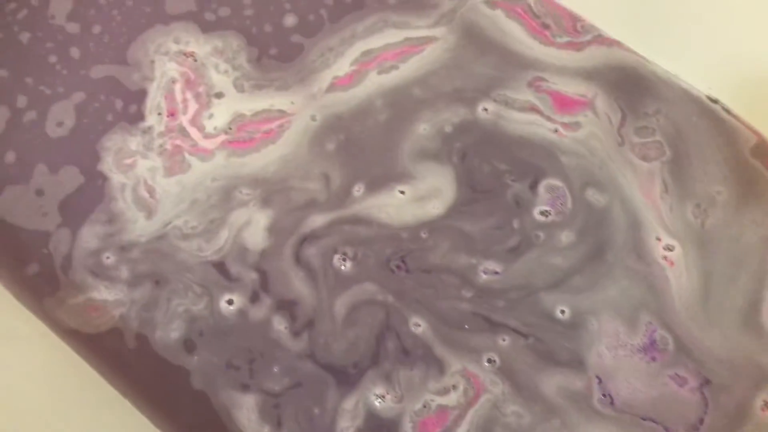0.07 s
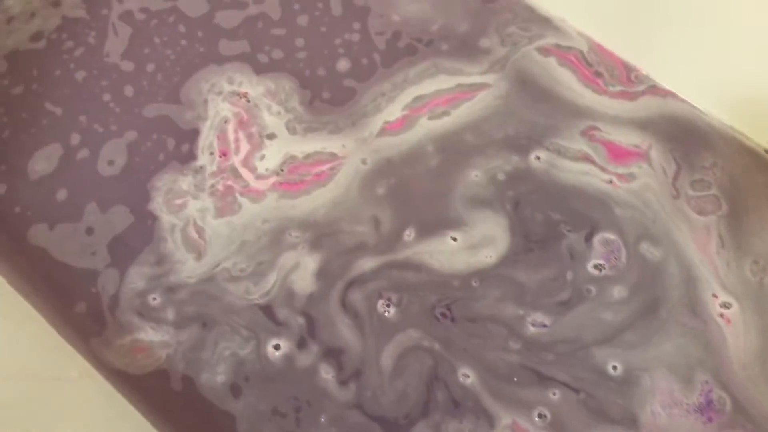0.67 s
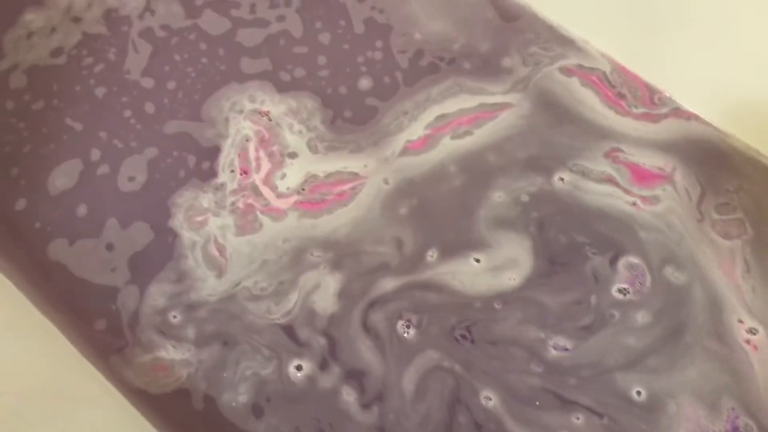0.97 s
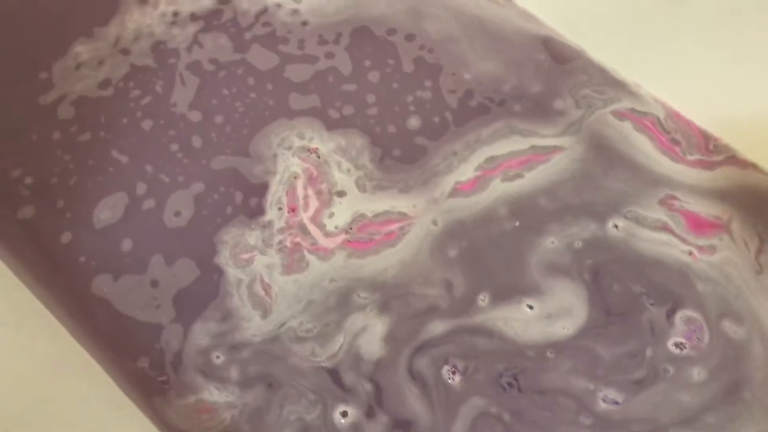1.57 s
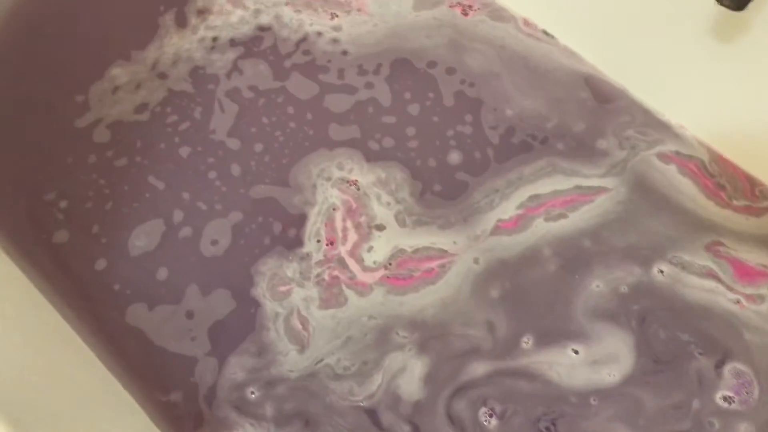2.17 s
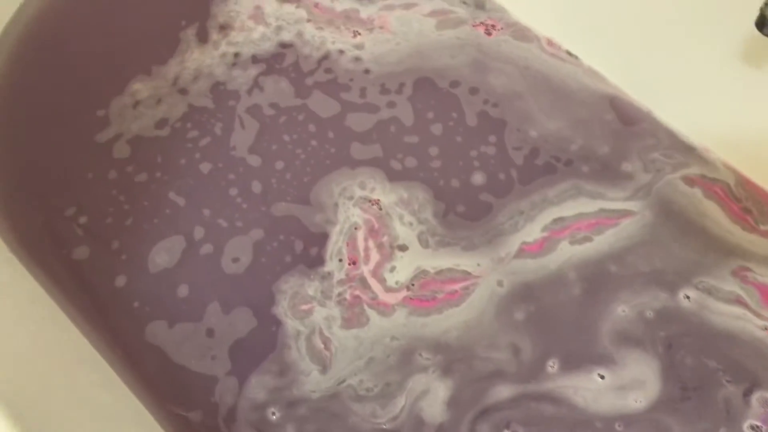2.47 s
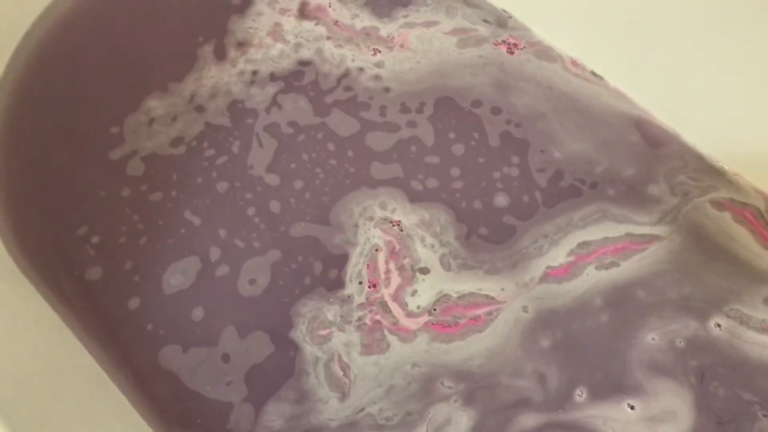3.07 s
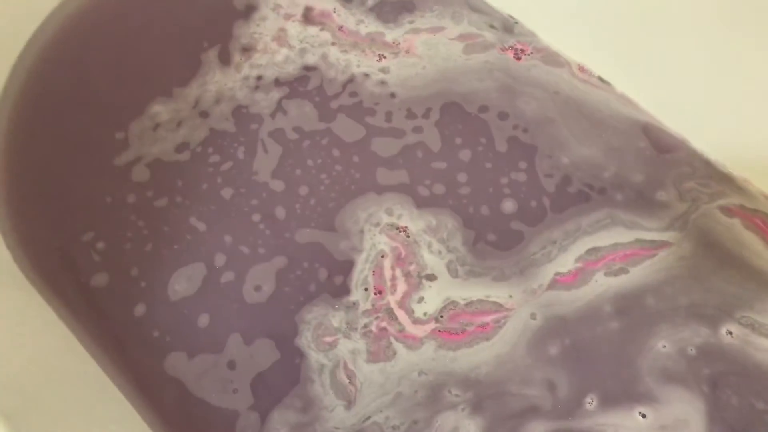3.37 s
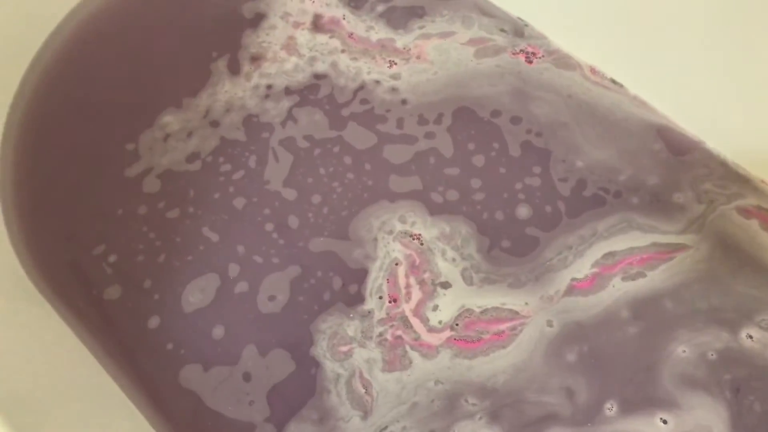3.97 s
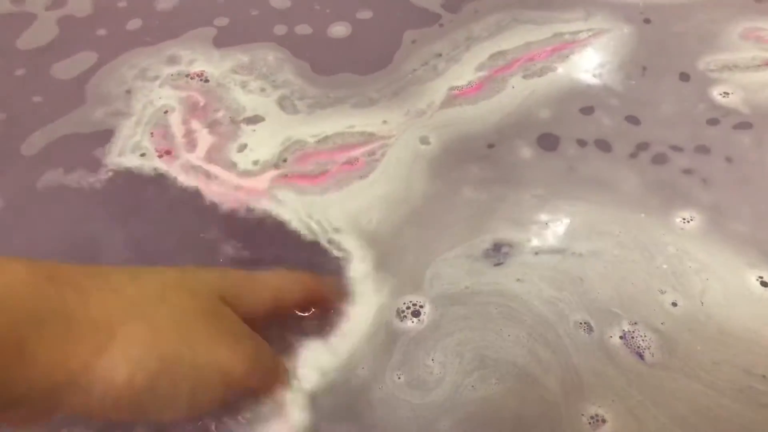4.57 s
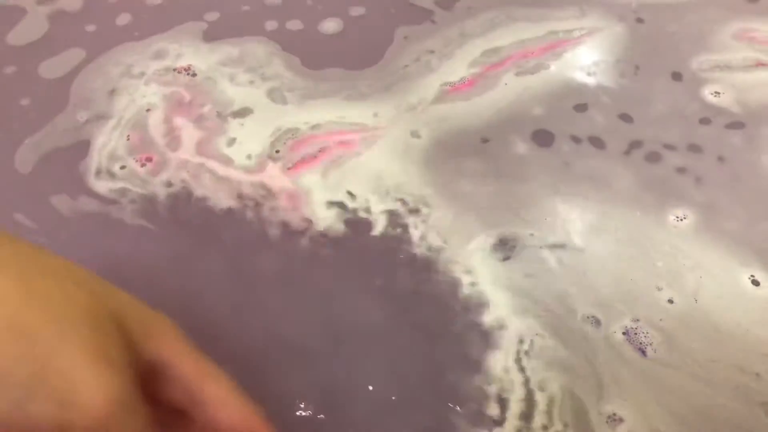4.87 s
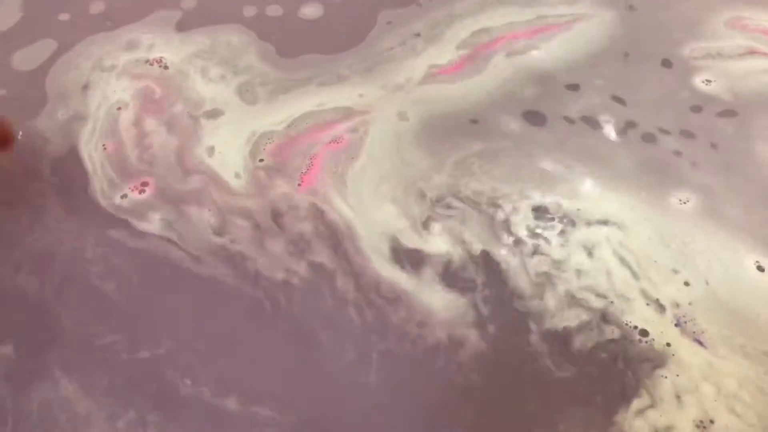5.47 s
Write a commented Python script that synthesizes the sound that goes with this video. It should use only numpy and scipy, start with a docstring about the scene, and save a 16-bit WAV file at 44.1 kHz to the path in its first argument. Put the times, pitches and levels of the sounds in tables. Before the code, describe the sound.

A quiet bathroom hums, then a hand sweeps through a foamy bath with a fizzing hiss, soft water movement and tiny drips.

```python
"""A hand sweeps through a full, foamy bath: the foam hisses, the water heaves softly, and small
bubbles and drips plink, each ringing on between the tub and the tiled walls. The hand comes late,
around a brief dip in level; before it there are only two soft rustles and a stray plink and tick.
Under it all lies the quiet bathroom: a low wavering hum, room rumble, a thin hiss and a faint
electrical sizzle."""
import sys
import numpy as np
from scipy import signal
from scipy.fft import rfft, irfft, next_fast_len
from scipy.io import wavfile
from scipy.ndimage import map_coordinates

SR = 44100
rng = np.random.default_rng(int(sys.argv[2]) if len(sys.argv) > 2 else 0)


def generate_wav(sig):
    """Save sig (samples, or channels by samples) to the path in sys.argv[1] as 16-bit PCM at SR."""
    pcm = np.round(np.clip(np.atleast_2d(sig).T, -1, 1) * 32767).astype(np.int16)
    wavfile.write(sys.argv[1], SR, pcm)


N = 248283
TIME = np.arange(N) / SR
DIP_S = 4.094


def foam(start_s=4.25, growth_db_per_s=2):
    """The foam hisses more and more as the hand parts it, then slowly settles."""
    parted = envelope(start_s, attack_s=0.27, hold_s=0.64, fall_db_per_s=11.5)
    growth_db = growth_db_per_s * (TIME - start_s)  # ever more cells burst, which also slows the fall
    return amp(-70 + growth_db + 0.48 * wobble(18)) * parted * fizz()


# The bright colour of froth. Each row: frequency in Hz, relative level in dB.
FIZZ_COLOUR = [(800, -30), (2500, -3.5), (4500, -4.5), (7000, 0), (8200, 0.5), (8900, 1), (9600, 2),
               (10400, -2.5), (11600, 2), (14000, 2), (15800, -1)]
def fizz(bursts_per_s=2500, spread_db=4, grain_share=0.48):
    """Countless tiny cells burst; the finest merge into a smooth hiss."""
    fires = rng.random(N) < bursts_per_s / SR
    bursts = fires * rng.standard_normal(N) * amp(spread_db * rng.standard_normal(N))
    smooth = np.sqrt(1 - grain_share) * rng.standard_normal(N)
    return coloured(np.sqrt(grain_share) * unit(bursts) + smooth, FIZZ_COLOUR)


# The colours of the deepest rumble and of the pushed water.
# Each row: frequency in Hz, relative level in dB.
DEEP_COLOUR = [(20, -50), (34, -22), (45, 0.5), (50, -1.5), (56, -15), (80, -27), (150, -40), (400, -61),
               (900, -79)]
WASH_COLOUR = [(40, -18.5), (95, 2.5), (130, -0.5), (146, -9), (175, -1.5), (220, -3), (250, -21),
               (340, -7.5), (400, -33), (800, -45), (1400, -35), (2500, -52)]
def heave(start_s=4.07, attack_s=0.1, hold_s=1.12):
    """The hand's push lifts a deep rumble, which soon sinks back, and a dull wash, which lingers."""
    push = envelope(start_s, attack_s, hold_s, fall_db_per_s=50)
    churn = envelope(start_s, attack_s, hold_s, fall_db_per_s=5)
    rest_db = -63 + 4.5 * bump(0.73, 1.5)  # the rumble swells once before the hand comes
    deep = np.hypot(amp(rest_db), amp(-53) * push) * noise(DEEP_COLOUR)
    wash = amp(-60 + 0.76 * wobble(5.2)) * churn * noise(WASH_COLOUR)
    return deep + wash


# Bubbles and drips. Each row: start in seconds, starting pitch in Hz, level in dB,
# seconds to fall 60 dB, reverb send in dB.
PLINKS = [ (1.2720, 2590, -57, .008, -7), (4.584, 3920, -48, 0.0095, 4), (4.5950, 3990, -51, 0.02, -1),
          (4.6150, 3620, -59, .016, 1), (4.6217, 3100, -54.5, 0.023, 0.5), (4.6310, 2180, -57, 0.024, 0.5),
          (4.6768, 8360, -36.5, 0.0031, -6.5), (4.7820, 3330, -50.5, 0.0038, -3),
          (4.783, 6900, -54, .004, -3), (5.1275, 6980, -40.5, 0.006, -10), (5.1286, 5500, -46, 0.0038, -3),
          (5.1743, 13300, -45, 0.0026, 0), (5.4329, 6200, -49.5, 0.0095, -3),
          (5.4434, 1900, -52, 0.019, 5.5), (5.502, 2910, -59, 0.021, -1), (5.503, 1240, -63, .025, 2),
          (5.528, 5730, -46, 0.0097, -9), (5.5280, 7750, -46, 0.0055, -9), (5.5278, 2530, -52, 0.014, -5),
          (5.5300, 1454, -62.5, 0.062, 2), (5.553, 2860, -59.5, 0.018, -1), (5.577, 2730, -61, 0.083, -1), ]
def bubbles(rise=0.13, attack_s=0.00007):
    """Each trapped bubble rings at its own pitch, rising slightly as it nears the surface."""
    out, t = np.zeros(N), np.arange(SR // 12) / SR
    for start, hz, db, t60, reverb_db in PLINKS:
        pitch = hz * (1 + rise * np.minimum(t / t60, 1))
        gain = amp(db - 60 * t / t60) * (1 - np.exp(-t / attack_s))
        ring = gain * np.sin(2 * np.pi * np.cumsum(pitch) / SR)
        add(out, start, in_room(ring, reverb_db))
    return out


# Small ticks. Each row: start in seconds, level in dB before the trim, band centre in Hz.
FILM_SNAPS = [(1.812, -56, 13000), (4.584, -55.5, 5950), (4.782, -56, 8000), (5.002, -59, 12000),
              (5.174, -58, 5000), (5.433, -59, 6500), (5.443, -53, 3500), (5.575, -56, 3700)]
def ticks(t60=0.018, width_octaves=0.51, trim_db=-6):
    """Films of water snap: a brief broad crack with no pitch."""
    out, t = np.zeros(N), np.arange(SR // 30) / SR
    for start, db, centre_hz in FILM_SNAPS:
        band = lambda hz: np.exp(-0.5 * (np.log2((hz + 1) / centre_hz) / width_octaves) ** 2)
        burst = unit(filtered(rng.standard_normal(len(t)), band))
        crack = burst * amp(db + trim_db - 60 * t / t60)
        add(out, start, in_room(crack, reverb_db=-5))
    return out


# The reverb of the tiled room. Each row: frequency in Hz, seconds to fall 60 dB.
TILE_DECAY = [(500, 0.54), (2000, 0.53), (4000, 0.46), (9000, 0.42), (15000, 0.05)]
# Echoes off the tub's sides and the nearest wall. Each row: typical delay in seconds, gain in dB.
WALL_ECHOES = [(.0017, -7.5), (0.0118, -12.5)]
def in_room(sound, reverb_db, path_spread=0.12):
    """A short sound, its nearest echoes and a diffuse tail at reverb_db against its own energy."""
    hz, t, spectrum = signal.stft(rng.standard_normal(SR // 2), SR, nperseg=256)
    decay = amp(-60 * t / along(TILE_DECAY, hz)[:, None]) * (1 - np.exp(-t / 0.0011))
    impulse_response = signal.istft(spectrum * decay, SR, nperseg=256)[1]
    tail = signal.fftconvolve(sound, impulse_response)
    out = tail * amp(reverb_db) * np.linalg.norm(sound) / np.linalg.norm(tail)
    add(out, 0, sound)
    for delay, db in WALL_ECHOES:
        # every spot on the water lies at its own distance from the walls
        add(out, delay * np.exp(path_spread * rng.standard_normal()), amp(db) * sound)
    return out


# The dull body of a rustle. Each row: frequency in Hz, relative level in dB.
RUSTLE_COLOUR = [(300, -30), (900, 1), (1600, -4), (3200, 1), (3900, -17), (6000, -32)]
# The rustle cues. Each row: start in seconds, body level in dB, fizz level in dB.
RUSTLE_CUES = [(.445, -74, -67.5), (.965, -86, -72.5)]
def rustles():
    """Soft, uneven rustles with a fizzy top, early on."""
    body = amp(2.4 * wobble(70)) * noise(RUSTLE_COLOUR)
    top = fizz()
    out = np.zeros(N)
    for start, body_db, top_db in RUSTLE_CUES:
        gain = envelope(start, attack_s=0.026, hold_s=0.01, fall_db_per_s=186)
        out += gain * (amp(body_db) * body + amp(top_db) * top)
    return out


# The deep tone sinks and returns. Each row: middle in seconds, length in seconds, depth in dB.
DEEP_LULLS = [(.1, 0.52, 6), (0.403, 0.27, 7.5), (0.884, 0.28, 17), (1.927, 0.28, 6), (2.163, 0.23, 11),
              (3.347, 0.15, 24), (4.448, 0.56, 18.5), (4.888, 0.95, 6)]
# The fader ride of the middle tone. Each row: time in seconds, level in dB.
MIDDLE_RIDE = [(0, -65.5), (.75, -63.5), (1.08, -72), (1.5, -64), (1.75, -72.5), (2.1, -68), (4.0, -83.5),
               (5.0, -60), (5.63, -62.5)]
# The upper tone swells. Each entry: middle of a swell in seconds.
UPPER_SWELLS = [2.003, 3.72, 4.03]
# The hum's fainter tones. Each row: pitch in Hz, level in dB before the trim.
FAINT_TONES = [(89.5, -62), (133.5, -68), (198, -70), (216, -69.5), (338, -75.5), (542, -81.5)]
def hum(deep_hz=67.2, middle_hz=156.7, upper_hz=264, faint_trim_db=-5):
    """A low hum, as of a distant fan: each tone wavers at random in level and pitch."""
    lull_db = sum(depth * bump(middle, length) for middle, length, depth in DEEP_LULLS)
    out = amp(-50 - lull_db + 2.3 * wobble(14)) * tone(deep_hz, drift_hz=1.5, rate=12)
    middle_db = np.interp(TIME, *np.transpose(MIDDLE_RIDE))
    out += amp(middle_db + 1.3 * wobble(7)) * tone(middle_hz, drift_hz=0.8, rate=6)
    swell = amp(-62.5) * sum(bump(middle, 0.25) for middle in UPPER_SWELLS)
    upper_gain = np.hypot(amp(-72.5 + 2.5 * wobble(11)), swell)
    out += upper_gain * tone(upper_hz, drift_hz=3.6, rate=22)
    for hz, db in FAINT_TONES:
        out += amp(db + faint_trim_db + 2.94 * wobble(7)) * tone(hz, drift_hz=2.19, rate=9)
    return out


# The dark colour of the room tone. Each row: frequency in Hz, relative level in dB.
RUMBLE_COLOUR = [(20, -44), (40, 5), (60, 4), (105, 2.5), (145, -6.5), (190, -2), (240, -4.5), (310, -6.5),
                 (400, -11.5), (600, -16), (1000, -21), (2000, -27.5), (4500, -49)]
def room_rumble():
    """The room's steady, low bed of noise."""
    return amp(-61.5) * noise(RUMBLE_COLOUR)


# The thin colour of the hiss. Each row: frequency in Hz, relative level in dB.
HISS_COLOUR = [(300, -31.5), (2500, 3), (4300, 1), (4950, -3), (5500, 0), (7100, 0), (7600, -1), (8050, 0),
               (9500, -1.5), (10400, -4.5), (12000, 0.5), (13800, -3.5), (15000, -0.5)]
def hiss():
    """The microphone's thin, even hiss."""
    return amp(-73.5) * noise(HISS_COLOUR)


# The colour of each electrical click. Each row: frequency in Hz, relative level in dB.
CLICK_COLOUR = [(1000, -17.5), (2500, -5.5), (5000, -15.5), (6300, -9.5), (7100, -3), (7600, -9.5),
                (8050, 2), (8800, -17), (9500, -2), (10450, -12), (12400, 0), (13800, -11.5), (14700, -2),
                (15600, -8)]
def sizzle(clicks_per_s=900, spread_db=5.5, bunching=1.4, fall_db_per_s=0.83):
    """A faint electrical sizzle: tiny clicks come in regular bunches, which slow after the dip."""
    bunch_hz = np.where(TIME < DIP_S, 29.9, 20)
    pulse = np.sin(2 * np.pi * np.cumsum(bunch_hz) / SR)
    busy = np.exp(bunching * pulse + 0.6 * wobble(250))
    fires = rng.random(N) < clicks_per_s / SR * busy / busy.mean()
    clicks = fires * rng.choice([-1, 1], N) * amp(spread_db * rng.uniform(-2.8, 2.6, N))
    age = np.where(TIME < DIP_S, TIME, TIME - DIP_S)  # the slow fade starts afresh at the dip
    return amp(-76.5 - fall_db_per_s * age) * coloured(clicks, CLICK_COLOUR)


def amp(db):
    """Decibels to gain."""
    return 10 ** (np.asarray(db) / 20)


def unit(x):
    """x at rms 1."""
    return x / np.sqrt(np.mean(x ** 2) + 1e-20)


def along(points, hz):
    """(Hz, value) points read on a log axis."""
    freqs, values = np.transpose(points)
    return np.interp(np.log(hz + 1), np.log(freqs + 1), values)


def filtered(x, response):
    """x through an EQ given as gain against frequency."""
    size = next_fast_len(len(x) + SR // 4)
    return irfft(rfft(x, size) * response(np.fft.rfftfreq(size, 1 / SR)), size)[:len(x)]


def coloured(x, colour):
    """x shaped by a colour table, at rms 1."""
    return unit(filtered(x, lambda hz: amp(along(colour, hz))))


def noise(colour):
    """Steady noise of the given colour, at rms 1."""
    return coloured(rng.standard_normal(N), colour)


def wobble(rate):
    """A smooth random curve, rate knots a second."""
    return map_coordinates(rng.standard_normal(int(N * rate / SR) + 4), [TIME * rate])


def tone(hz, drift_hz, rate):
    """A sine of rms 1 whose pitch wanders."""
    cycles = np.cumsum(hz + drift_hz * wobble(rate)) / SR
    return np.sqrt(2) * np.sin(2 * np.pi * (cycles + rng.random()))


def envelope(start_s, attack_s, hold_s, fall_db_per_s):
    """A gain that rises to 1, holds, then dies away."""
    t = TIME - start_s
    return np.clip(t / attack_s, 0, 1) * amp(-fall_db_per_s * np.maximum(t - attack_s - hold_s, 0))


def bump(middle_s, length_s):
    """A smooth rise from 0 to 1 and back."""
    return np.cos(np.pi * np.clip((TIME - middle_s) / length_s, -0.5, 0.5)) ** 2


def add(track, start_s, sound):
    """Mix a sound into the track from start_s on."""
    part = track[round(start_s * SR):][:len(sound)]
    part += sound[:len(part)]


def scene():
    """The bath and the room around it, in mono."""
    water = foam() + heave() + bubbles() + ticks()
    return (water + rustles() + hum() + room_rumble() + hiss() + sizzle())[None]


def record(dry, fade_s=0.026, top_hz=15800):
    """The level dips briefly to nothing and returns; nothing passes above top_hz."""
    dip_gain = np.clip(np.abs(TIME - DIP_S) / fade_s, 0, 1) ** 1.05
    return filtered(dry[0] * dip_gain, lambda hz: hz < top_hz)[None]


dry = scene()
out = record(dry)
generate_wav(out)
```